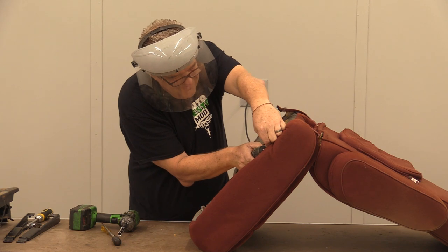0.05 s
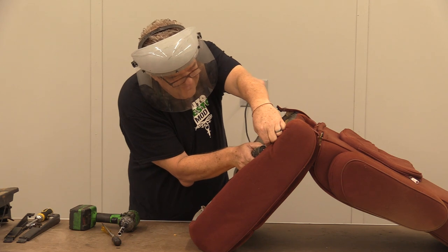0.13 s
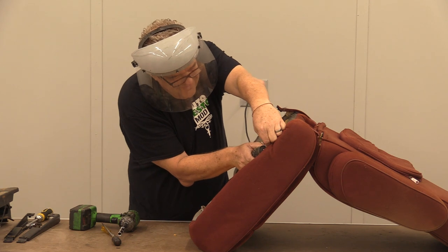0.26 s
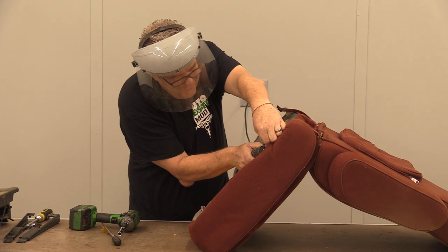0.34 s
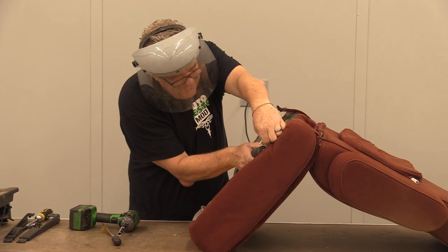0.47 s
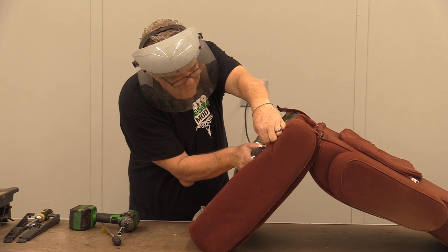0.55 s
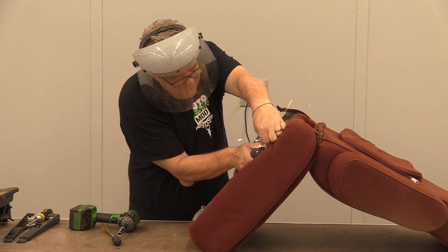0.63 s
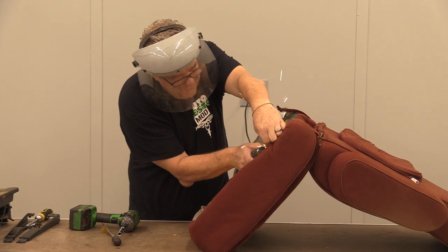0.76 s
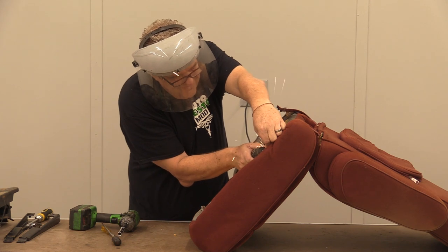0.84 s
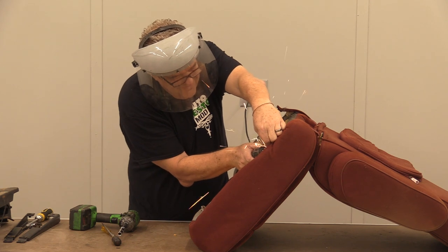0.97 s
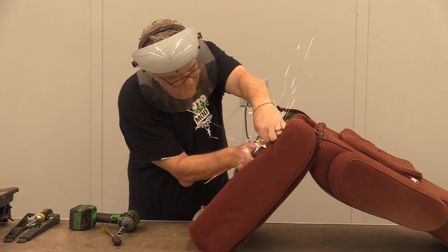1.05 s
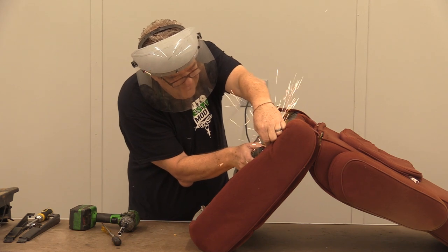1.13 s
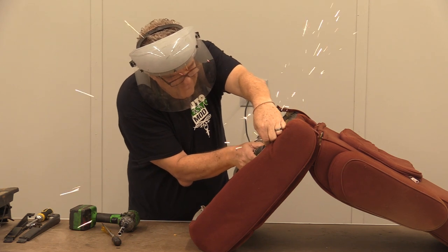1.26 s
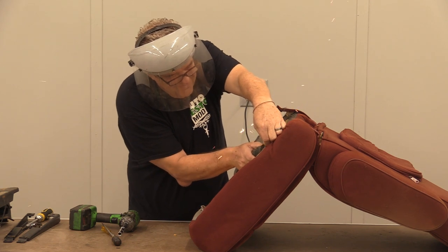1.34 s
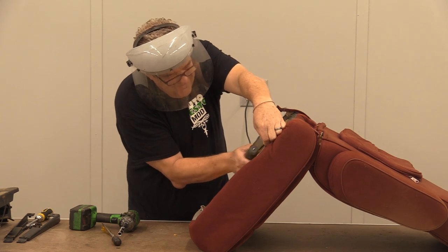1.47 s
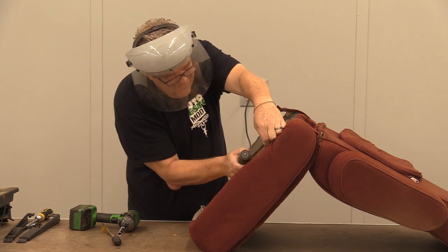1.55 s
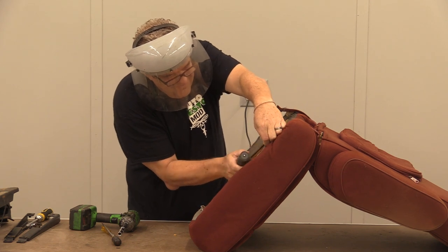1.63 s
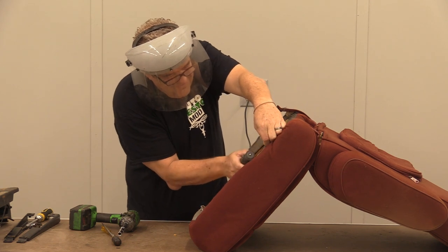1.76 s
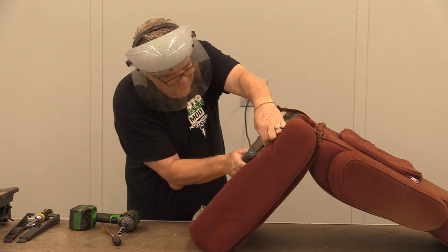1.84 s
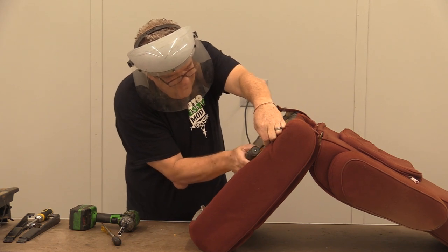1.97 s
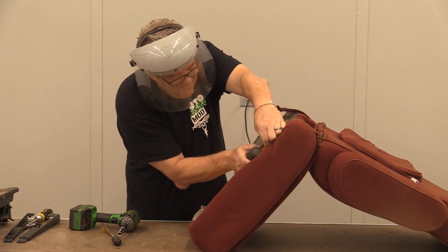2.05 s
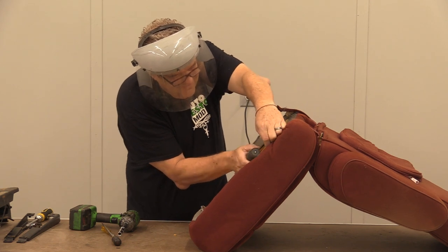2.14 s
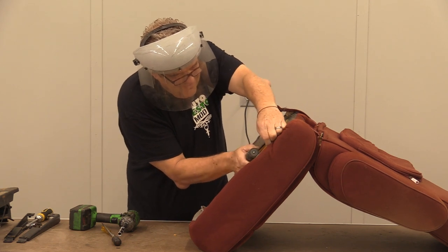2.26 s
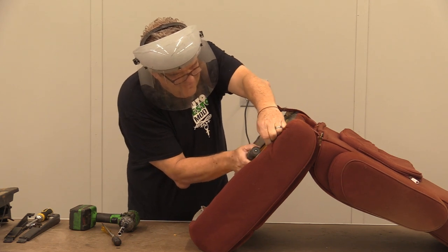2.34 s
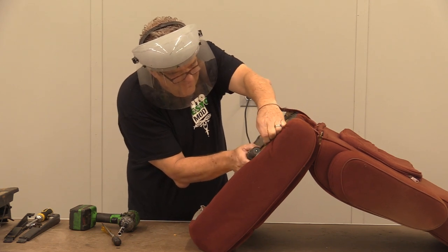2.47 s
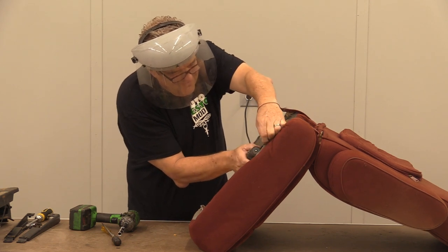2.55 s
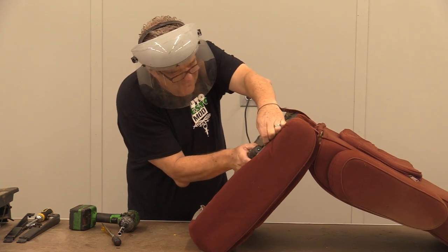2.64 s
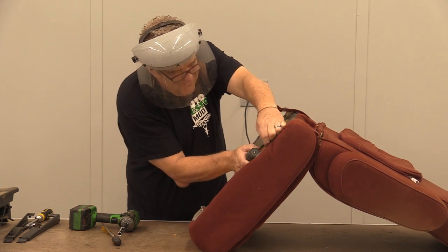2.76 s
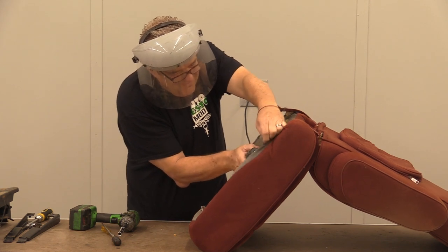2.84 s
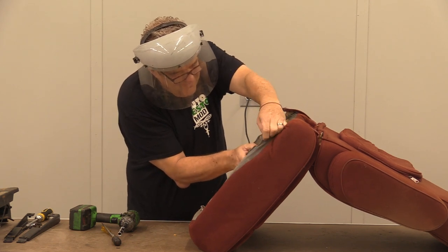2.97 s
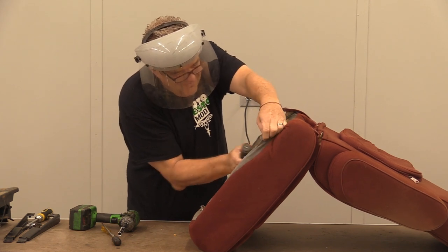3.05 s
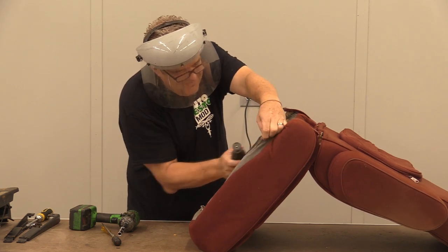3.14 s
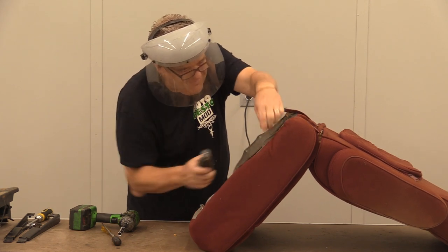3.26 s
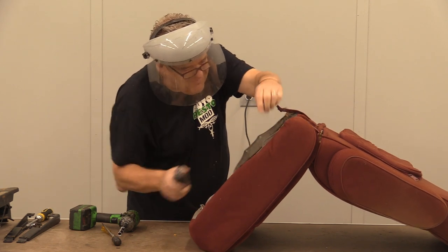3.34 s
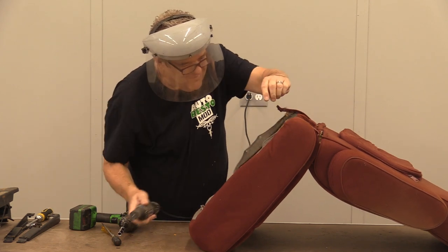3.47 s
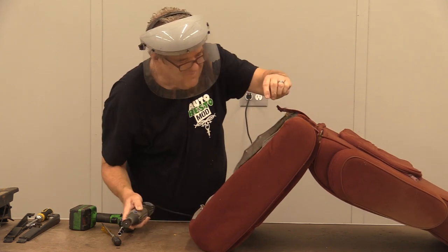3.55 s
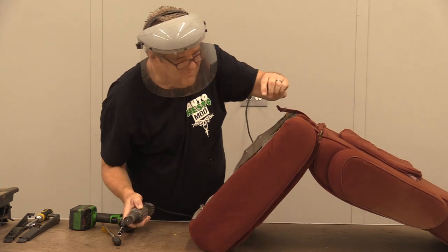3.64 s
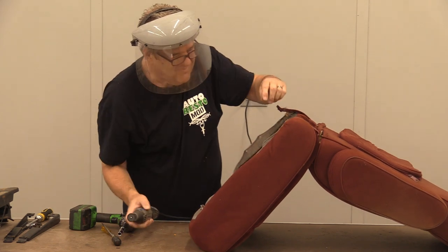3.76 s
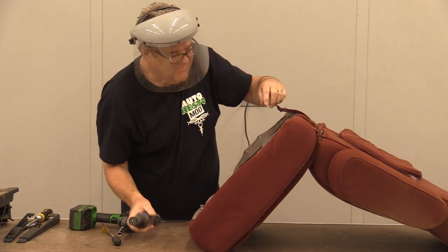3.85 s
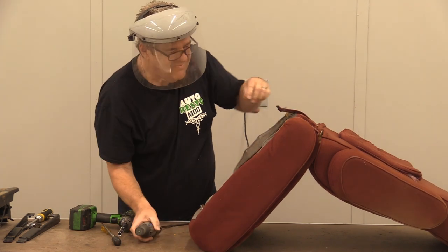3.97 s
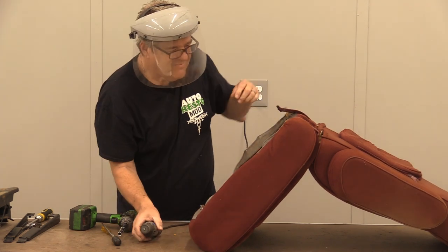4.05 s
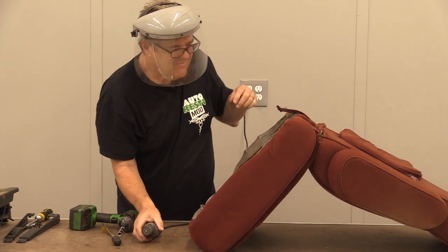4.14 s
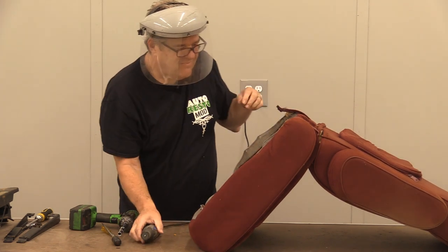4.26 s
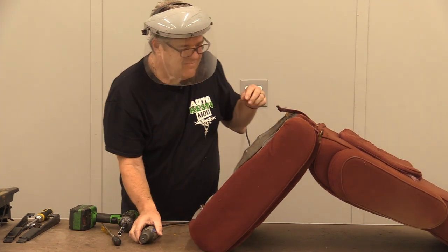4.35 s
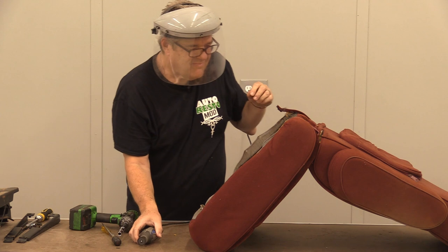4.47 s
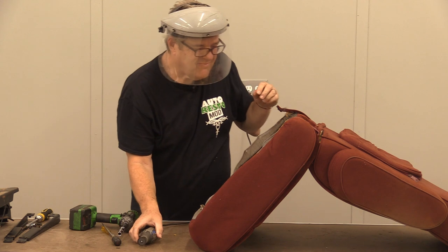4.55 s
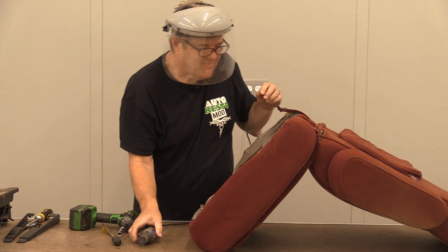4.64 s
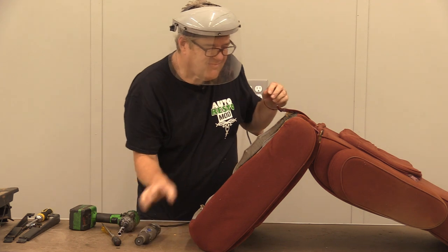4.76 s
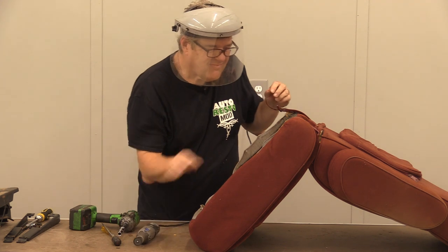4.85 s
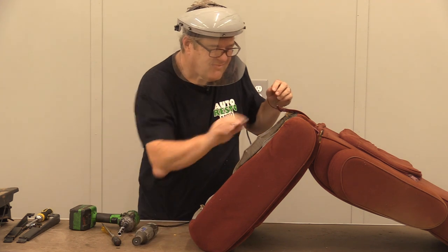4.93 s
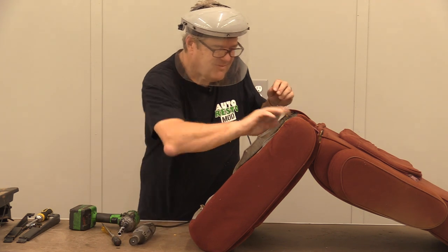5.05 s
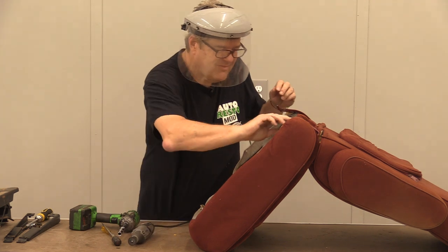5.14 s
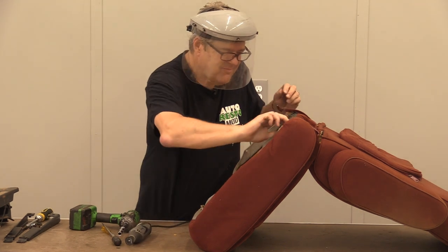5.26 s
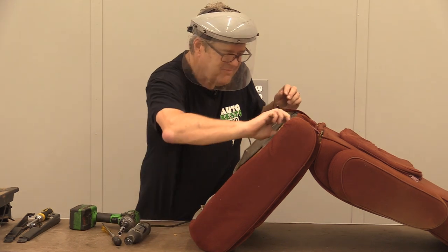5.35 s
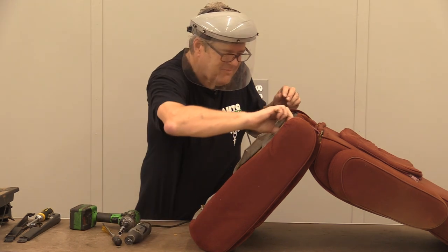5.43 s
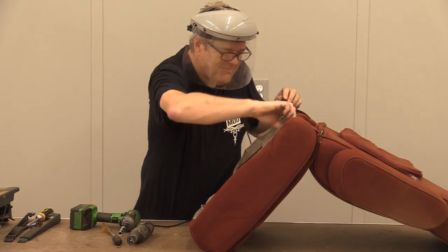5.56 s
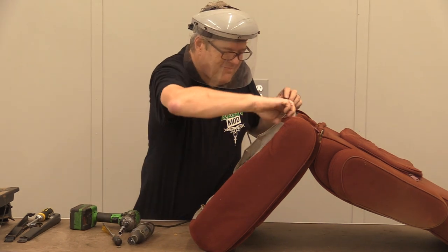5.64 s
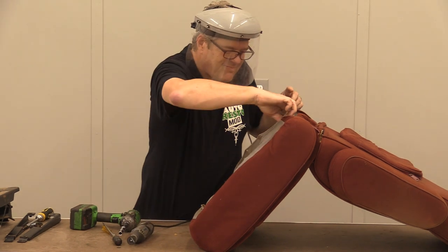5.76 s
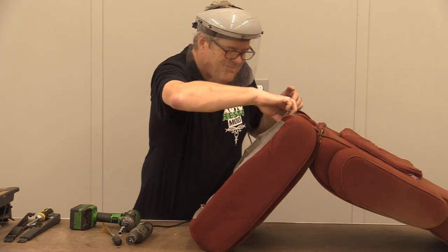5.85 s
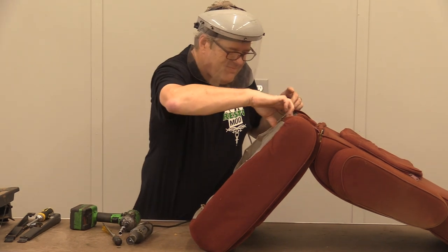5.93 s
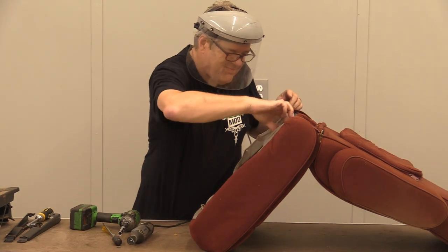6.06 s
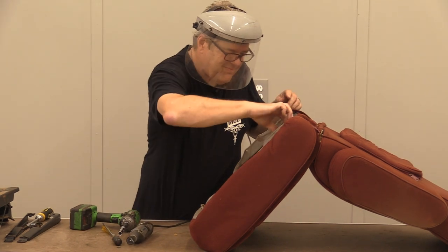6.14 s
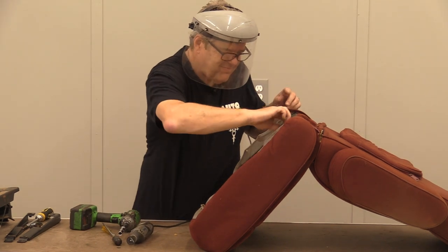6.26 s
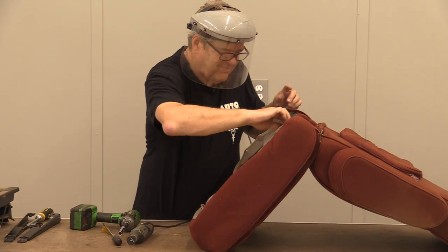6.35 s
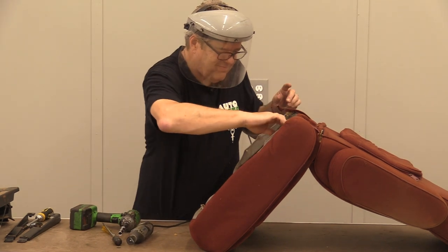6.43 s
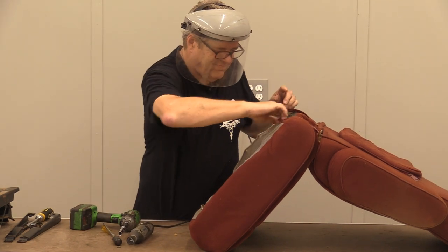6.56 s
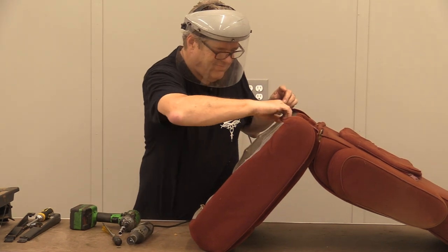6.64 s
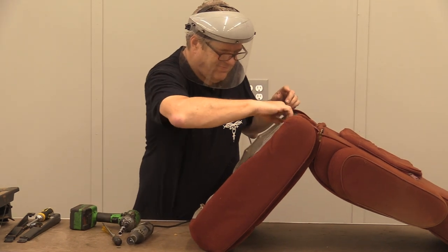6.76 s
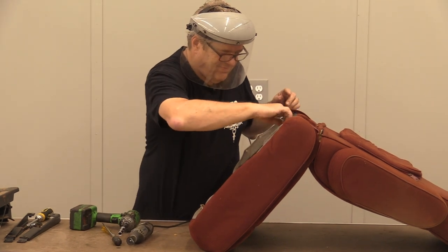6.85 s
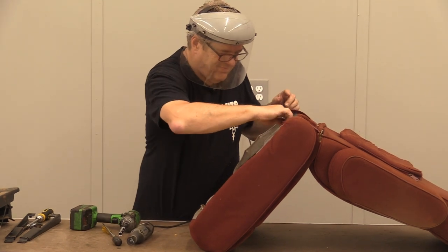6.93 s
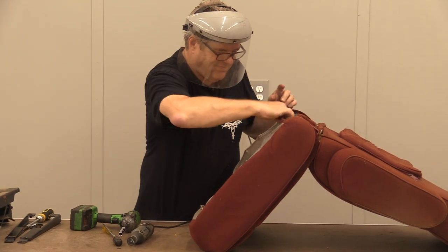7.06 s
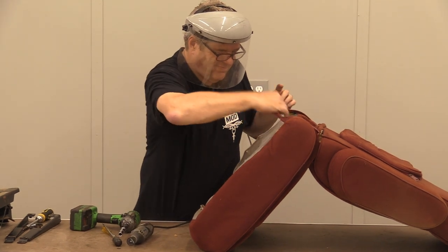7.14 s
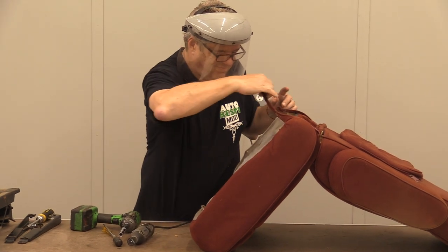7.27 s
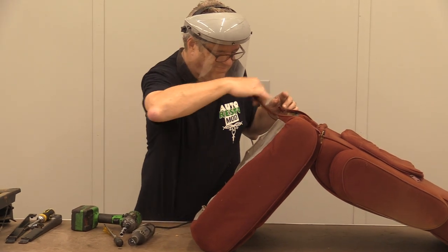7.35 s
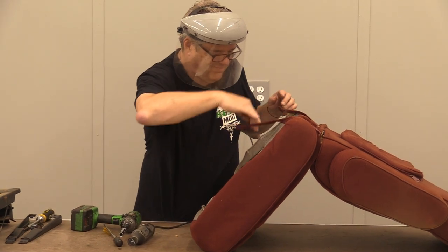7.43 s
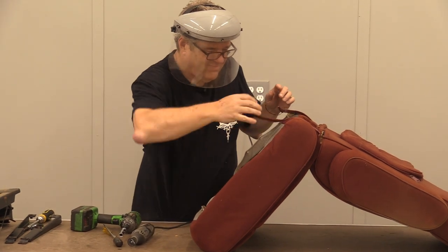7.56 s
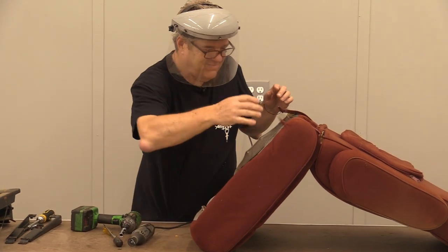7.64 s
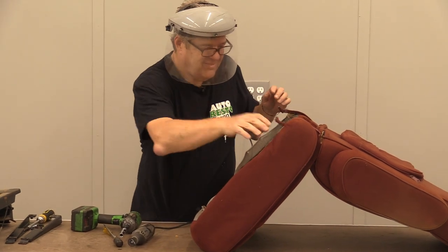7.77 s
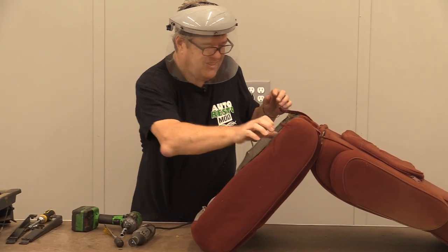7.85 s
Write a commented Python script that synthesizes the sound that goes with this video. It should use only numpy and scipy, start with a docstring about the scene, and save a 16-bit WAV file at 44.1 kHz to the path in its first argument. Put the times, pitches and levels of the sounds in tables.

```python
"""A small workshop hums with ventilation while a handheld rotary tool grinds a steel fastener on a car seat.
Disc noise and tones grow and change as the shaft slows; then the free motor whines on multiples of its speed.
Switched off and laid on the workbench, it drones, buzzes and clicks until the rotor stops.
Then the seat frame is knocked and tugged (decaying partials) amid soft rustles and hisses (shaped noise)."""
import sys
import numpy as np
from scipy import signal
from scipy.fft import rfft, irfft, next_fast_len
from scipy.io import wavfile
from scipy.ndimage import uniform_filter1d

SR = 44100
rng = np.random.default_rng(int(sys.argv[2]) if len(sys.argv) > 2 else 0)


def log_audio(samples):
    """Write samples as a 16-bit WAV file to the path given in sys.argv[1]."""
    # one column per channel
    frames = np.atleast_2d(samples).T
    # limit to full scale, then quantise
    limited = np.clip(frames, -1, 1)
    pcm = np.round(limited * 32767).astype(np.int16)
    wavfile.write(sys.argv[1], SR, pcm)


N = 348390

IDLE_HZ, LABOUR_HZ = 370, 272  # shaft speed at no load and at full load, turns a second
OFF_S, BENCH_S = 3.605, 4.293  # switched off; laid on the bench


def amp(db):
    """Decibels to a linear gain."""
    return 10 ** (np.asarray(db) / 20)


def unit(x):
    """x scaled to rms 1."""
    return x / np.sqrt(np.mean(x ** 2) + 1e-20)


def clock():
    """The time of every sample in seconds."""
    return np.arange(N) / SR


def along(points, hz):
    """Read (Hz, value) points along a log frequency axis."""
    f, v = np.transpose(points)
    return np.interp(np.log(hz + 1), np.log(f + 1), v)


def after(s, rise):
    """A smooth step from 0 to 1 centred on time s; rise is its half duration in seconds."""
    return .5 + .5 * np.tanh((clock() - s) / rise)


def swell(s, half_length):
    """A smooth bump of height 1 about time s."""
    return np.exp(-((clock() - s) / half_length) ** 2)


def wobble(rate):
    """A random curve with rate knots a second."""
    knots = rng.standard_normal(int(N * rate / SR) + 2)
    return np.interp(clock() * rate, np.arange(len(knots)), knots)


def filtered(x, response):
    """x passed through a gain that is a function of frequency."""
    m = next_fast_len(N + 8192, real=True)
    return irfft(rfft(x, m) * response(np.fft.rfftfreq(m, 1 / SR)), m)[:N]


def coloured(x, spectrum):
    """x filtered by the given spectrum, at rms 1."""
    return unit(filtered(x, lambda hz: amp(along(spectrum, hz))))


def noise(spectrum, size=1):
    """Coloured noise whose excitation follows size."""
    return coloured(size * rng.standard_normal(N), spectrum)


def steady(x):
    """x held at rms 1 over every tenth of a second."""
    return x / np.sqrt(np.abs(uniform_filter1d(x ** 2, SR // 10)) + 1e-6)


def add(track, s, sound):
    """Mix a sound into the track at time s."""
    part = track[round(s * SR):][:len(sound)]
    part += sound[:len(part)]


def workshop():
    """Ventilation: beating low tones over a soft rush; it comes up once the tool is laid down."""
    # Low tones of the ventilation. Each row: frequency in Hz, level in dB.
    hum_tones = [(80.7, -65), (96.9, -58.5)]
    # Spectrum of the rush. Each row: frequency in Hz, relative level in dB.
    rush_spectrum = [(20, -6), (40, -4), (65, -5), (100, 2.5), (160, -6), (250, -9.5), (400, -10),
                     (600, -14), (1300, -19.5), (2300, -27), (4000, -36.5), (6300, -35.5), (10000, -39),
                     (15500, -39)]
    hum = np.zeros(N)
    for hz, db in hum_tones:
        level = np.sqrt(2) * amp(db + 0.95 * wobble(6.6))
        hum += level * np.sin(2 * np.pi * hz * clock() + 0.49 * wobble(7.1))
    rush = amp(-58.5) * noise(rush_spectrum)
    return (hum + rush) * amp(-17 * (1 - after(BENCH_S, 0.011)))


def room(x):
    """The walls' short answer: decaying noise in which each frequency dies at its own speed."""
    # Decay of the room. Each row: frequency in Hz, time to fall by 60 dB in seconds.
    decay = [(150, 0.49), (1500, 0.54), (12000, 0.46)]
    hz, t, z = signal.stft(rng.standard_normal(SR // 2), SR, nperseg=256)
    fading = z * amp(-60 * t / along(decay, hz)[:, None])
    tail = signal.istft(fading, SR, nperseg=256)[1]
    delayed = np.pad(tail, (SR // 200, 0))  # the walls answer 5 ms late
    return signal.fftconvolve(x, delayed / np.linalg.norm(tail))[:N]


def rustles():
    """Soft rustles and hisses, grainy noise that swells and decays; some are the room trailing after a knock."""
    # Soft rustles and hisses, some of them the room's answer trailing after a knock.
    # Each row: start in seconds, 60 dB decay in seconds, rustle in dB, hiss in dB.
    soft_rustles = [(5.502, 0.47, -56, -60.5), (5.64, .3, -48, -70), (5.865, 0.22, -54.5, -68),
                    (5.97, 1.7, -82, -67.5), (6.712, 0.13, -46.5, -78), (6.83, .2, -72, -64.5),
                    (7.19, 0.5, -50, -71)]
    rise_share = 0.037  # rise time as a share of the decay time
    rustle_hz, hiss_hz = 1370, 6900
    out = np.zeros(N)
    t = np.arange(SR) / SR
    hz = np.fft.rfftfreq(len(t), 1 / SR)
    for s, t60, rustle_db, hiss_db in soft_rustles:
        onset = 1 - np.exp(-(t / (rise_share * t60)) ** 2)
        envelope = onset * amp(-60 * t / t60)
        for db, centre_hz in (rustle_db, rustle_hz), (hiss_db, hiss_hz):
            grains = rng.standard_normal(len(t)) * amp(2.6 * wobble(400)[:len(t)])
            band = 1 / (1 + (np.log2((hz + 1) / centre_hz) / 0.68) ** 4)
            add(out, s, amp(db) * unit(irfft(rfft(grains) * band, len(t))) * envelope)
    return out


def handling():
    """The seat frame rings dully under its padding, padding thumps, and small metal parts tick."""
    # Knocks on the frame. Each row: start in seconds, base level in dB, crack against that level in dB.
    frame_knocks = [(5.505, -37, -17), (5.624, -22, -8.5), (5.65, -31, -10), (6.451, -42, -25),
                    (6.582, -23.5, -17), (6.64, -39.5, -26), (6.715, -39.5, -28), (7.445, -48, -24)]
    # Modes of the frame. Each row: nominal frequency in Hz, relative level in dB, 60 dB decay in seconds.
    frame_modes = [(363, -12.5, 0.063), (480, 7, 0.027), (745, -1, 0.059), (995, -9, 0.022),
                   (1390, -19, 0.01), (1730, -7.5, 0.027)]
    # Soft bumps on the padding. Each row: start in seconds, base level in dB.
    soft_bumps = [(4.064, -49.5), (5.262, -43), (5.314, -54), (5.629, -29.5), (5.831, -48), (7.672, -47)]
    # Small hard ticks. Each row: start in seconds, base level in dB.
    hard_ticks = [(5.4311, -50), (5.7935, -42), (6.1964, -44.5), (6.4647, -48), (6.5395, -41.5),
                  (6.8698, -52), (7.4063, -52), (7.703, -44.5)]
    t = np.arange(SR // 4) / SR
    soft = 1 - np.exp(-t / 0.00099)  # padding blunts each contact

    def fade(t60):
        return amp(-60 * t / t60)

    def burst(t60):
        return fade(t60) * rng.standard_normal(len(t))

    def thump(hz, t60):
        tone = np.sin(2 * np.pi * hz * rng.uniform(0.803, 1.2) * t)
        return tone * fade(t60) * (1 - np.exp(-t / 0.0018))

    def frame_ring():
        ring = np.zeros(len(t))
        for hz, level_db, t60 in frame_modes:
            level = amp(level_db + rng.normal(0, 0.53)) * rng.choice([-1, 1])
            ring += level * np.sin(2 * np.pi * hz * rng.uniform(0.832, 1.08) * t) * fade(t60)
        return ring

    # strikes: start in seconds, then base level, thump, ring and crack in dB
    strikes = [(s, db, -14.5, -10, crack_db) for s, db, crack_db in frame_knocks]
    # a hard tug drags the cover over the frame in quick slips, each stronger than the last
    tug_s, slip_s, slip_count = 7.09, .0116, 6
    for k in range(slip_count):
        strikes.append((tug_s + k * slip_s, -25.5 + k * 2.0, -6, -6.5, -14.5))

    body, clack, crack = np.zeros((3, N))
    for s, db, thump_db, ring_db, crack_db in strikes:
        add(body, s, amp(db + ring_db) * frame_ring() * soft + amp(db + thump_db) * thump(190.5, 0.073))
        add(clack, s, amp(db + 2.5) * burst(0.046) * soft)
        add(crack, s, amp(db + crack_db + 8.5) * burst(0.024) * soft)
    for s, db in soft_bumps:
        add(body, s, amp(db + 6.5) * thump(174, 0.067))
        add(clack, s, amp(db) * burst(0.066) * soft)
    for s, db in hard_ticks:
        add(crack, s, amp(db + 1) * burst(0.01))
    # filters: (Hz, gain in dB)
    dull = [(60, -11), (300, 3.0), (1400, -1.5), (2500, -14), (5000, -27.5)]
    sharp = [(500, -14), (2500, -9), (4300, -11.5), (6300, -1.5), (9500, -5), (12500, -9.5), (15500, -15)]
    clack = filtered(clack, lambda hz: amp(along(dull, hz)))
    crack = filtered(crack, lambda hz: amp(along(sharp, hz)))
    return body + clack + crack


def shaft_speed():
    """Turns a second: driven until switched off, then braked by brush friction and by drag in step with speed."""
    # Shaft speed in the cut. Each row: time in seconds, speed in turns a second.
    cut_speed = [(0.0, 355.6), (0.08, 347.1), (0.094, 352.4), (0.324, 355.1), (0.534, 338.4),
                 (0.692, 307.6), (0.954, 305.6), (1.064, 292.7), (1.124, 276.6), (1.192, 271.1),
                 (1.244, 275.9), (1.27, 289.4)]
    # Shaft speed running free. Each row: time in seconds, speed in turns a second.
    free_speed = [(1.29, 297.6), (1.45, 362.8), (1.53, 379.0), (1.69, 376.0), (1.89, 364.8), (2.47, 372.7),
                  (2.72, 366.8), (2.93, 370.8), (3.3, 369.5), (3.34, 363.9), (3.6, 364.5)]
    friction_hz_per_s, drag_per_s = 153.5, .34
    s, hz = np.transpose(np.vstack([cut_speed, free_speed]))
    driven = np.interp(clock(), s, hz)
    offset = friction_hz_per_s / drag_per_s
    coasting = np.exp(-drag_per_s * np.maximum(clock() - OFF_S, 0))
    return np.maximum((driven + offset) * coasting - offset, 0)


def revolving(turns, strengths, wear, wear_rate):
    """A bumpy profile read once a turn; wear slowly reshapes it, so that each harmonic wavers on its own."""
    def profile():
        phases = np.exp(2j * np.pi * rng.random(len(strengths)))
        shape = unit(irfft(np.r_[0, strengths * phases], 4096))
        return np.interp(turns % 1, np.linspace(0, 1, len(shape) + 1), np.r_[shape, shape[0]])
    return profile() + wear * sum(profile() * wobble(wear_rate) for _ in range(2))


def orders(count):
    """The multiples 1, 2, .. of the shaft speed."""
    return np.arange(1, count + 1)


def many_modes(x, spacing_hz, depth_db):
    """Crowded resonances of a large body: each partial swells and sinks as it glides through them."""
    ripple = rng.standard_normal(512)

    def response(hz):
        resonances = np.interp(hz / spacing_hz, np.arange(len(ripple)), ripple)
        return amp(depth_db * resonances * np.clip(hz / 4000, 0, 1))
    return filtered(x, response)


def slowing(speed, db, knee_hz, power):
    """A gain that holds above the knee (turns a second) and falls as a power of speed below it."""
    return amp(db) / np.sqrt(1 + (knee_hz / (speed + 1)) ** (2 * power))


def on_bench(turns, speed):
    """The bench top sounds the rotor: a drone from its unbalance, a buzz from eight bars under the brushes."""
    # Spectra of the bench buzz, the brush rasp and the single bar clicks.
    # Each row: frequency in Hz, relative level in dB.
    buzz_spectrum = [(400, -27), (900, -17), (1160, 15.5), (1400, 6), (1700, 4), (2200, 7.5), (3300, -3.5),
                     (4150, 7), (4700, 1), (5300, 7.5), (8000, 4), (12000, 3), (16000, -12)]
    rasp_spectrum = [(25, -9), (150, -4), (400, -24), (700, -4.5), (1250, 0), (2200, -3), (3300, -8.5),
                     (5000, -2), (7600, -5), (9200, 7), (10400, 2), (11500, 0), (13000, 1), (16000, 0)]
    click_spectrum = [(1500, -4), (4000, -7), (6000, -4), (8000, -13), (10000, 6), (11500, -1.5),
                      (13000, 3), (16000, -3.5)]
    stop_s = 5.33
    k = orders(count=104)
    from_bar = np.abs((k + 4) % 8 - 4)  # distance to the nearest multiple of eight
    # unequal bars put sidebands beside each multiple of eight, and strong lines at twelve and thirty-two
    lines = [k == 32, from_bar == 0, k == 12, from_bar == 1]
    strengths = amp(np.select(lines, [3, 0, -2.5, -8], -15))
    strengths = strengths * amp(-.22 * np.maximum(k - 66, 0))
    rotor = revolving(turns, strengths, wear=.55, wear_rate=16)
    rotor = many_modes(rotor, spacing_hz=300, depth_db=1.5)

    # as the rotor slows the tones die and the rasp breaks into one click per bar
    ringing = 1 - after(4.98, .07)
    buzz = slowing(speed, db=-41, knee_hz=169, power=2.28) * ringing * steady(coloured(rotor, buzz_spectrum))
    # the bench top rings as partials glide through its mode
    mode_hz, half_width_hz, boost_db = 1125, 60, 4.5
    buzz = filtered(buzz, lambda hz: amp(boost_db / (1 + ((hz - mode_hz) / half_width_hz) ** 2)))

    bars = np.cos(2 * np.pi * 8 * turns)
    rasp_level = slowing(speed, db=-37.5, knee_hz=186, power=2.5) + amp(-57.5) * np.clip(speed / 18, 0, 1)
    rasp = rasp_level * noise(rasp_spectrum, amp(1.8 * ringing * bars + 1.3 * wobble(700)))

    # approximate seconds since the last bar passed
    since_bar = ((8 * (turns - turns[-1]) + .52) % 1) / (8 * speed + 1)
    clicks = steady(noise(click_spectrum, np.exp(-since_bar / .001) * amp(1.3 * wobble(150))))
    clicks = amp(-53.5) * clicks * (1 - ringing) * (1 - after(stop_s, .02))

    drone_level = slowing(speed, db=-44.5, knee_hz=132, power=6.9) * amp(1.8 * wobble(30))
    drone = drone_level * np.sin(2 * np.pi * turns)
    return (drone + buzz + rasp + clicks) * after(BENCH_S, 0.0011)


def hollowed(x, depth):
    """x through a gliding broad resonance that sinks as the tool is lowered; depth (0-1) fades it in."""
    # Path of the resonance. Each row: time in seconds, centre in Hz.
    glide = [(3.45, 12800), (3.8, 10500), (4.0, 10100), (4.27, 8800)]
    hz, t, z = signal.stft(x, SR, nperseg=256)
    centre = np.interp(t, *np.transpose(glide))
    peak = np.exp(-((hz[:, None] - centre) / 1000) ** 2) - .35  # the rest of the band is turned down
    gain = amp(2.5 * peak * np.interp(t, clock(), depth))
    return signal.istft(z * gain, SR, nperseg=256)[1][:N]


def patchy(x, depth):
    """x with slowly shifting patches of colour; depth (0-1, per sample) fades them in."""
    hz, t, z = signal.stft(x, SR, nperseg=256)
    across_hz = uniform_filter1d(rng.standard_normal(z.shape), size=5, axis=0)
    field = unit(uniform_filter1d(across_hz, size=50, axis=1))
    gain = amp(1.5 * field * np.interp(t, clock(), depth))
    return signal.istft(z * gain, SR, nperseg=256)[1][:N]


def motor(turns, speed):
    """Unbalance, fan and commutator sing on multiples of shaft speed over rushing air; all fade as it slows."""
    # Tones of the free motor. Each row: multiple of the shaft speed, level in dB,
    # change when turned away in dB, power of the speed.
    motor_tones = [(1, -63, 1, 1.9), (2, -57.5, -32, 5.8), (3, -55.5, -13, 3.7), (4, -62.5, -8, 4),
                   (12, -71.5, 1.5, 3), (16, -64, -1.5, 2.1), (24, -44, -13.5, 1.9)]
    # Housing resonances that the commutator tone glides through. Each row: frequency in Hz, level in dB.
    housing = [(1600, -73), (2030, -71), (2200, -56), (2360, -46), (2540, -50), (2720, -52), (2890, -57),
               (2940, -69.5)]
    # Spectra of the vent rush, the fan hiss, and the brush hiss before and after the tool is turned over.
    # Each row: frequency in Hz, relative level in dB.
    vent_spectrum = [(25, -8.5), (70, -13.5), (300, -13.5), (550, -5), (900, -1.5), (1550, 0.5),
                     (2300, -11.5), (2900, -12.5), (3500, -23), (4500, -33), (8000, -40)]
    fan_spectrum = [(2500, -28), (4300, -26), (5200, -14), (6000, -4), (7400, 1.5), (9000, 1),
                    (10000, -3.5), (11500, -20), (16000, -29)]
    brush_spectrum = [(1200, -15.5), (2500, 0.5), (3100, -3), (4000, -10.5), (5500, -4.5), (8000, -5.5),
                      (10700, -1), (12800, 0.5), (14000, -2), (16000, -2.5)]
    turned_spectrum = [(1200, -20), (2500, -3.5), (4000, -9.5), (5500, -2), (8000, -4), (9500, -0.5),
                       (10500, 2), (11800, -3), (14000, -5), (16000, -6)]
    pace = np.clip(speed / IDLE_HZ, .1, 2)
    lifted = after(3.146, rise=0.032)  # the tool is lifted from behind the seat
    away = after(3.43, rise=0.1)  # then its vents are turned away
    # mains power pulls the rotor in small surges until it is switched off
    surge = np.sin(2 * np.pi * 120 * clock()) * (1 - after(OFF_S, .02))
    angle = 2 * np.pi * turns + 0.0051 * surge + .008 * wobble(60)

    def tone(order, db):
        waver_db = 1.5 + 3 * away  # wavers more while waved through the air
        level = np.sqrt(2) * amp(db + 1.2 * wobble(25) + waver_db * wobble(11))
        return level * np.sin(order * angle + 2 * np.pi * rng.random())

    tones = sum(pace ** power * tone(round(k), db + away_db * away) for k, db, away_db, power in motor_tones)
    housing_db = along(housing, 8 * speed)
    commutator = amp(-6.5 * after(OFF_S, 0.088)) * tone(order=8, db=housing_db)
    vent = amp(-52.5 - 5.2 * away) * pace ** 1.66 * noise(vent_spectrum)
    fan = amp(-46.5 + 3.5 * lifted - 23 * away) * pace ** 3 * noise(fan_spectrum)
    # the brush slots change colour as the hand turns the tool over
    turned = after(3.7, .12)
    sparks = amp(1.2 * wobble(500))
    brushes = np.sqrt(1 - turned) * noise(brush_spectrum, sparks)
    brushes = brushes + np.sqrt(turned) * noise(turned_spectrum, sparks)
    brushes = amp(-51 + 6.1 * lifted) * pace ** 1.67 * patchy(hollowed(brushes, away), lifted)
    return (tones + commutator + vent + fan + brushes) * after(1.26, 0.013) * (1 - after(4.55, 0.081))


def cutting(turns, speed):
    """The uneven disc strikes the steel every turn as its grit tears off chips; load sets each layer's level."""
    # The hand eases off or leans in. Each row: time in seconds, half length in seconds, change in dB.
    leans = [(0.34, .045, -2), (0.627, 0.11, 1.1), (0.93, .09, -1), (1.193, 0.023, 1.5)]
    # Spectra of the seat's rumble and low tones, the bite, the scrape as noise and as tones,
    # the sizzle and the squeal. Each row: frequency in Hz, relative level in dB.
    rumble_spectrum = [(15, 5.5), (45, -6), (90, -1), (350, -1), (600, -2), (1200, -5), (2400, -13.5),
                       (3500, -14), (6000, -55)]
    low_spectrum = [(200, -3), (330, 0), (650, 2), (950, -3.5), (1250, 2.5), (1600, -3), (2300, -21),
                    (3200, -22), (4500, -25), (7000, -30)]
    bite_spectrum = [(1300, -36), (1650, -11), (1850, 0), (2200, -1), (2500, -2.5), (3000, -19),
                     (4000, -27.5)]
    scrape_spectrum = [(2000, -4.5), (3200, -6), (4500, -7.5), (6200, -6), (7800, -4), (8700, -8.5),
                       (9700, 0.5), (10800, -11), (13000, -16), (16000, -30)]
    scrape_tone_spectrum = [(2000, -21), (3200, -11), (4500, -13), (6200, -9), (7800, -0.5), (8700, -6),
                            (9700, 2), (10800, -14), (13000, -24), (16000, -30)]
    sizzle_spectrum = [(9000, -24), (11500, -11), (13200, -4), (14200, 4), (15100, 8), (16000, -3)]
    squeal_spectrum = [(8000, -39), (9200, 4), (9700, 1), (10300, -15), (11000, -35)]
    release_s, graze_s = 1.274, 1.362
    load = np.clip((IDLE_HZ - speed) / (IDLE_HZ - LABOUR_HZ), 0, 1)
    lean_db = sum(db * swell(s, half_length) for s, half_length, db in leans)

    def layer(no_load_db, load_gain_db):
        return amp(no_load_db + load_gain_db * load + lean_db)

    # the disc breaks through, then grazes the edge once more
    contact = 1 - after(release_s, 0.0099) + 0.62 * swell(graze_s, 0.0099)
    # pressure slows the shaft and turns the bite from a hiss into a singing tone
    singing = np.clip((335 - speed) / 23, 0, 1)
    # the disc chatters in the slot, which roughens its upper harmonics
    chattering = turns + .002 * wobble(300)
    edge = revolving(chattering, np.ones(len(orders(count=58))), wear=.7, wear_rate=14)
    edge = many_modes(edge, spacing_hz=220, depth_db=2.8)
    chips = amp(2.1 * np.cos(2 * np.pi * turns) + 2.2 * wobble(900) + 1.4 * wobble(69.8))

    low_tones = steady(coloured(edge * amp(3.2 * wobble(60.5)), low_spectrum))
    seat = amp(-1.7) * noise(rumble_spectrum, chips) + amp(-4.0) * low_tones
    seat = layer(-41, 3.3) * seat

    bite_tone = amp(-13.0 + 11.5 * singing) * steady(coloured(edge, bite_spectrum))
    bite = layer(-45, 7.3) * (bite_tone + amp(-10.5) * noise(bite_spectrum, chips))

    scrape_tone = steady(coloured(edge * amp(0.95 * wobble(150)), scrape_tone_spectrum))
    scrape = layer(-40.5, 3.6) * amp(-4.0) * (scrape_tone + noise(scrape_spectrum, chips))

    sizzle_tone = amp(-0.5) * steady(coloured(edge, sizzle_spectrum))
    sizzle = layer(-40.5, -6) * (sizzle_tone + amp(-5.0) * noise(sizzle_spectrum, chips))

    # near the stall the last sliver of steel squeals
    squeal = amp(-42.5) * np.clip((296 - speed) / 15, 0, 1) * noise(squeal_spectrum, chips)
    jolt = amp(-43.5) * swell(graze_s, 0.016) * noise([(20, -5), (110, -8), (300, -31), (1000, -82)])
    return contact * (seat + bite + scrape + sizzle + squeal) + jolt


def scene():
    """One shaft drives the cut, the motor and the bench; both channels carry the same microphone."""
    speed = shaft_speed()
    turns = np.cumsum(uniform_filter1d(speed, SR // 40)) / SR
    direct = rustles() + handling() + on_bench(turns, speed) + cutting(turns, speed)
    mono = workshop() + amp(-17.5) * room(direct) + motor(turns, speed) + direct
    return np.tile(mono, (2, 1))


def record(dry):
    """The recorder keeps nothing above its band limit of 15830 Hz."""
    return np.array([filtered(channel, lambda hz: hz < 15830) for channel in dry])


dry = scene()
out = record(dry)
log_audio(out)
```